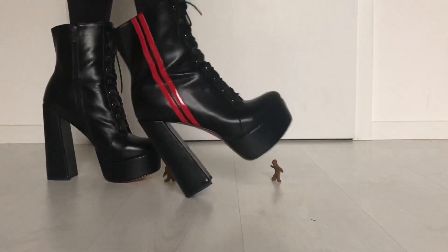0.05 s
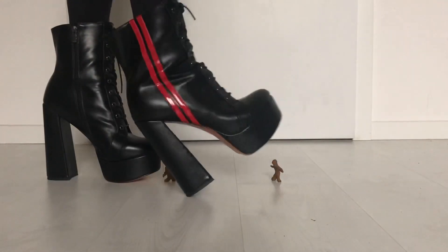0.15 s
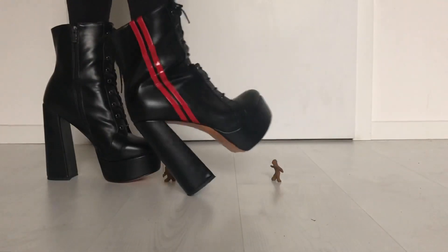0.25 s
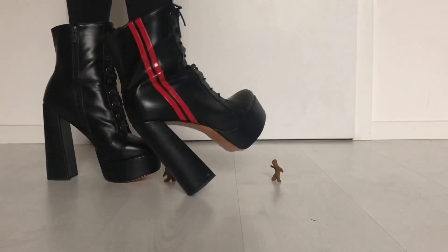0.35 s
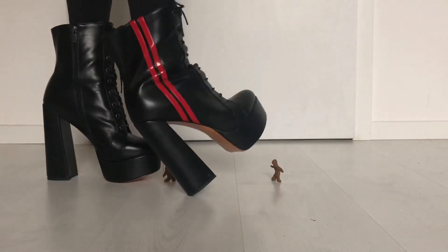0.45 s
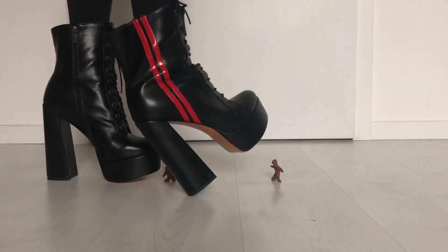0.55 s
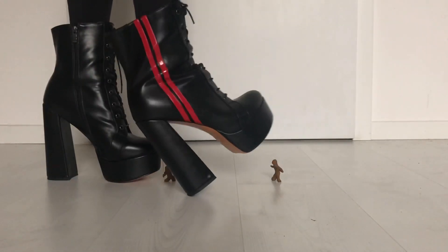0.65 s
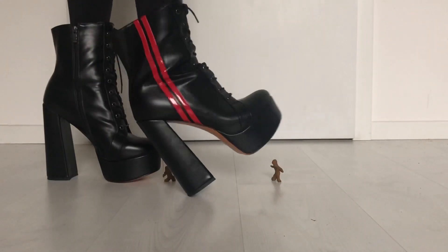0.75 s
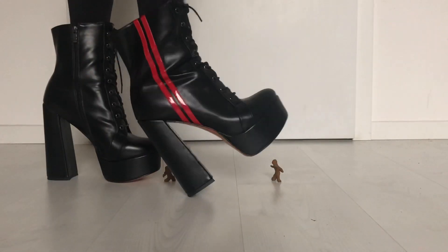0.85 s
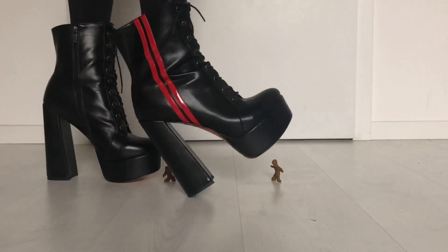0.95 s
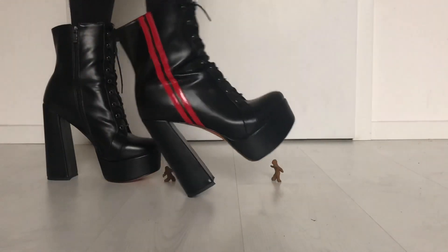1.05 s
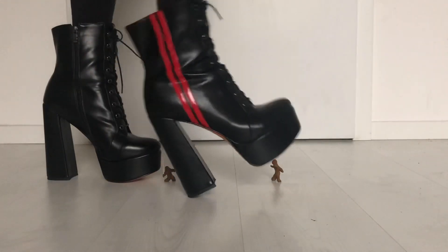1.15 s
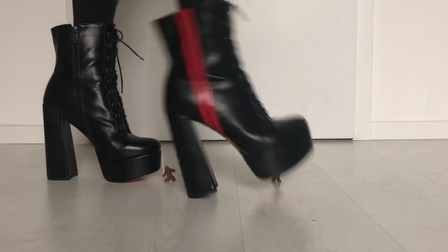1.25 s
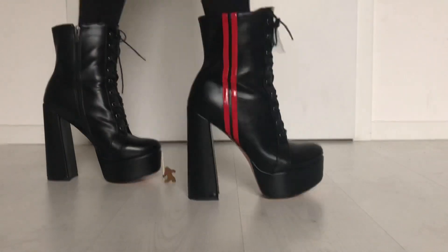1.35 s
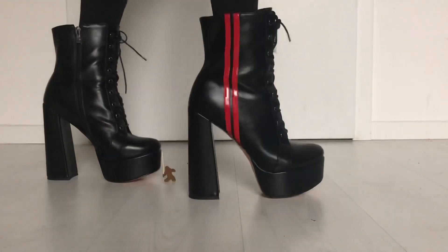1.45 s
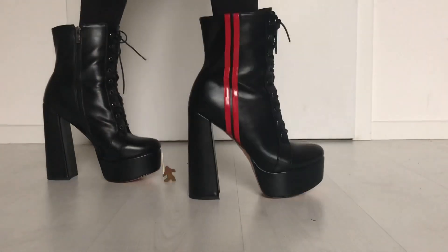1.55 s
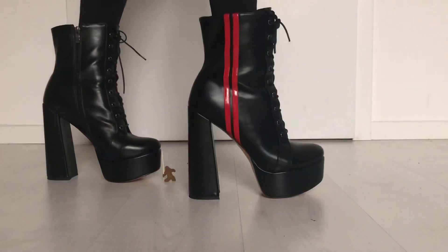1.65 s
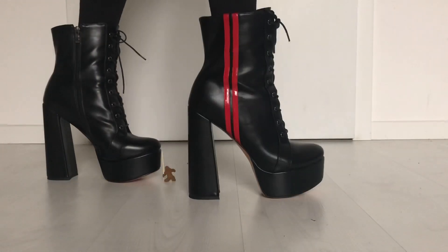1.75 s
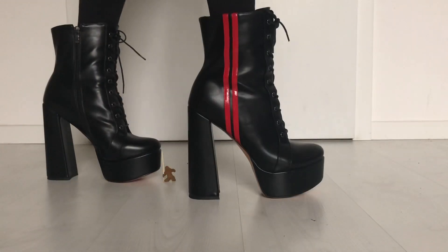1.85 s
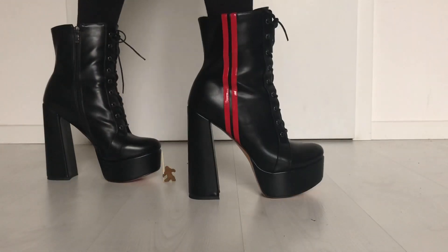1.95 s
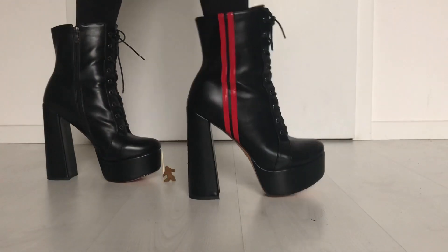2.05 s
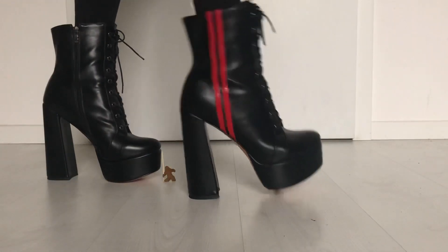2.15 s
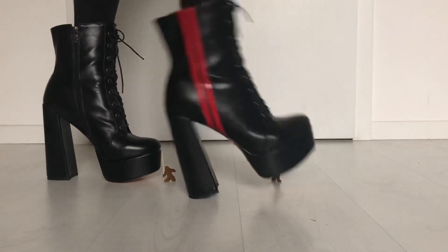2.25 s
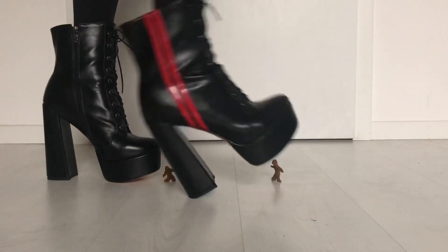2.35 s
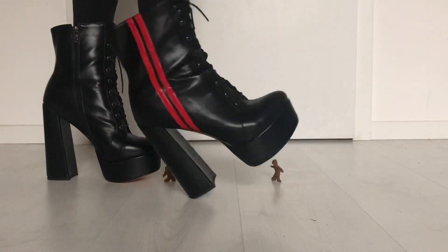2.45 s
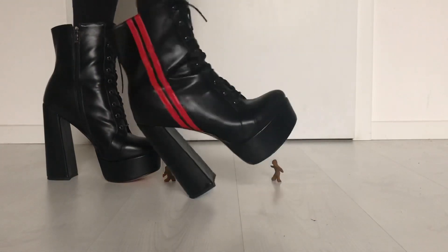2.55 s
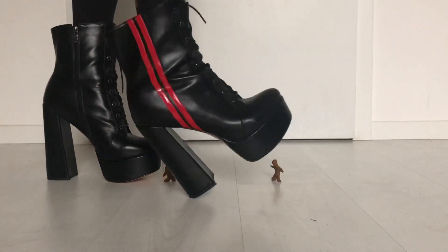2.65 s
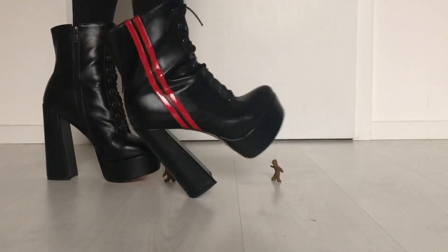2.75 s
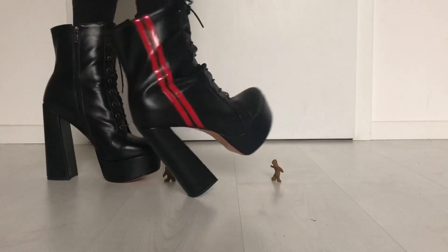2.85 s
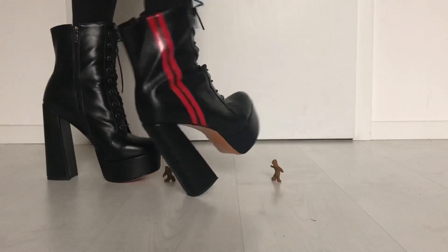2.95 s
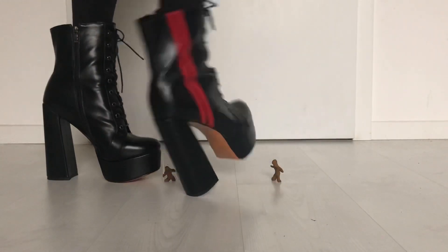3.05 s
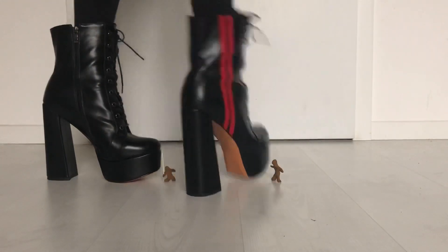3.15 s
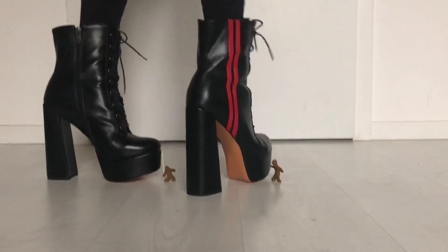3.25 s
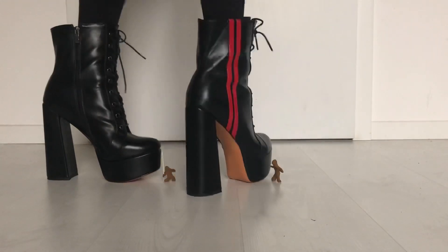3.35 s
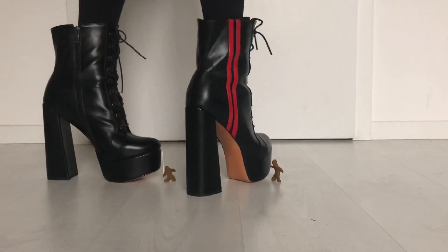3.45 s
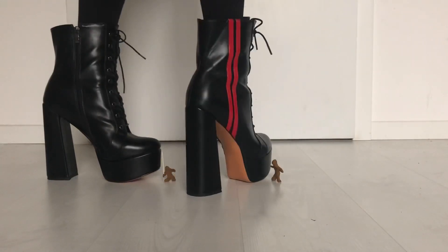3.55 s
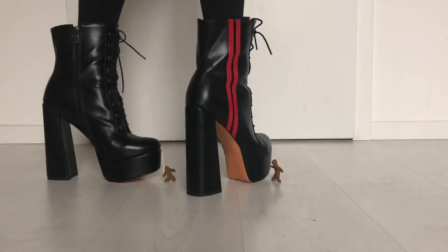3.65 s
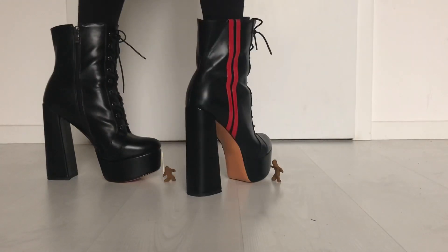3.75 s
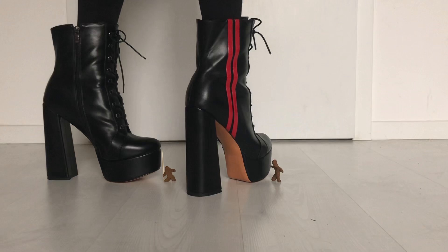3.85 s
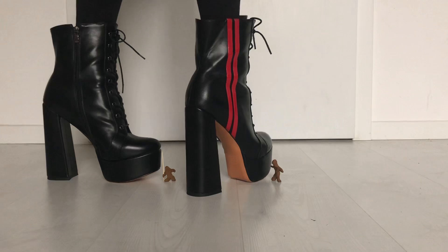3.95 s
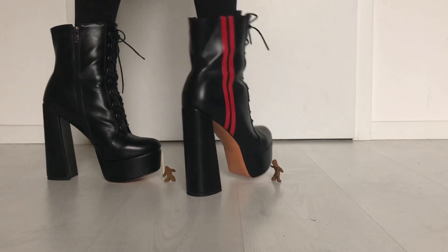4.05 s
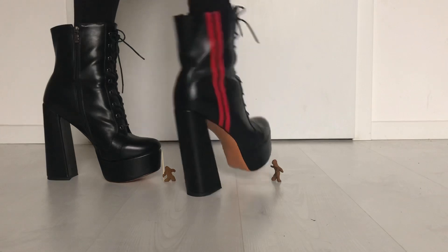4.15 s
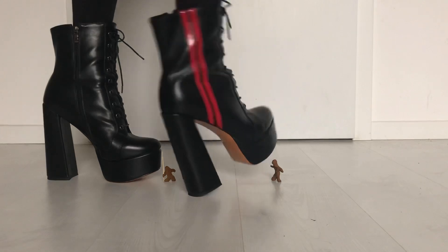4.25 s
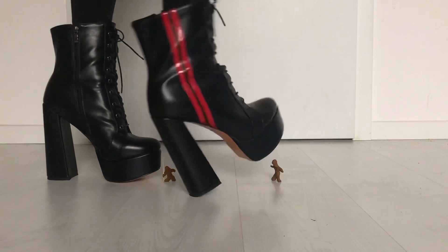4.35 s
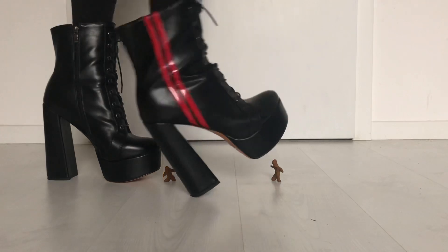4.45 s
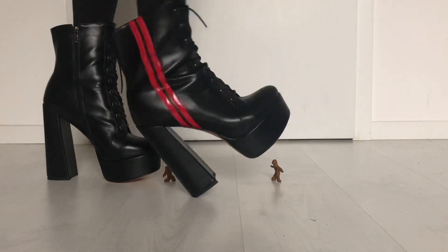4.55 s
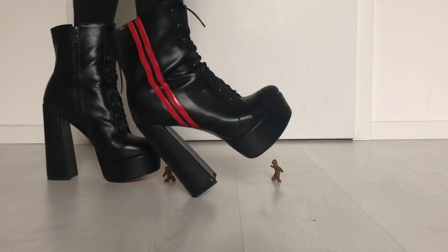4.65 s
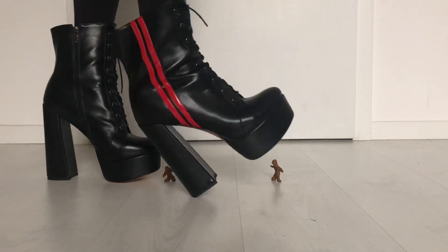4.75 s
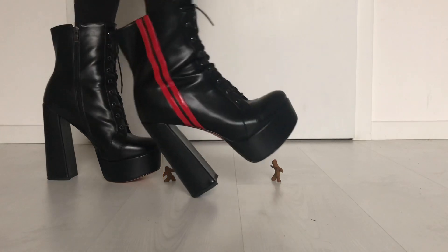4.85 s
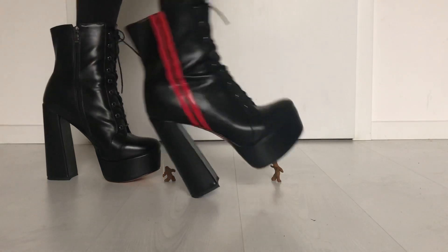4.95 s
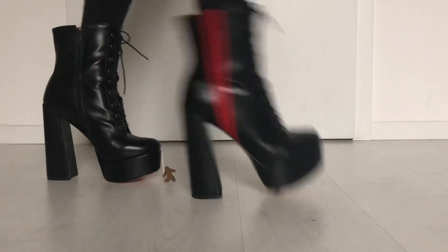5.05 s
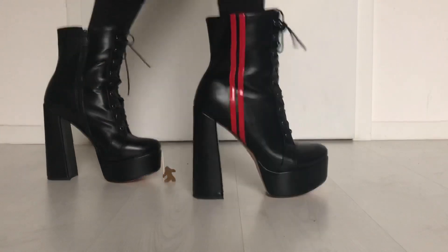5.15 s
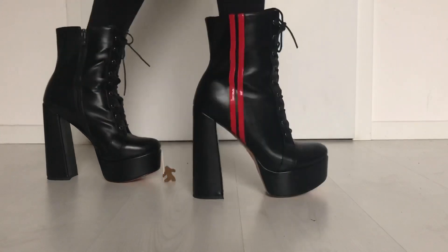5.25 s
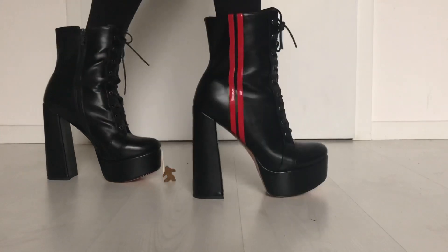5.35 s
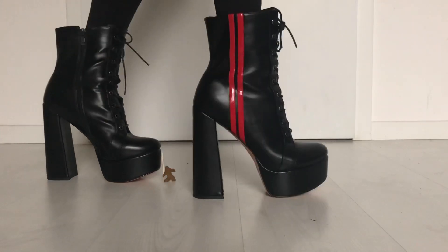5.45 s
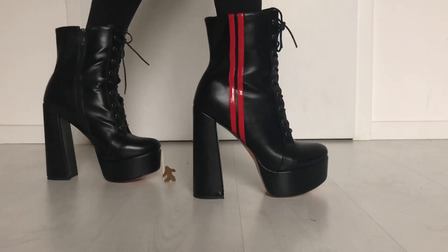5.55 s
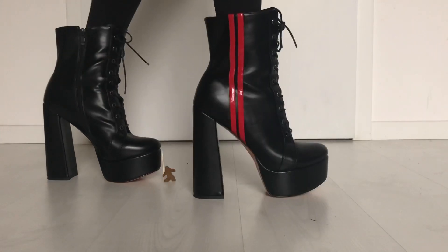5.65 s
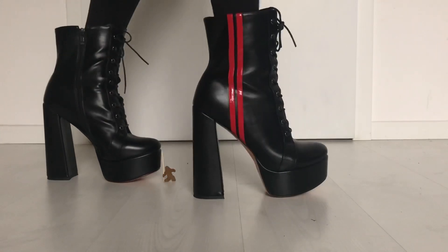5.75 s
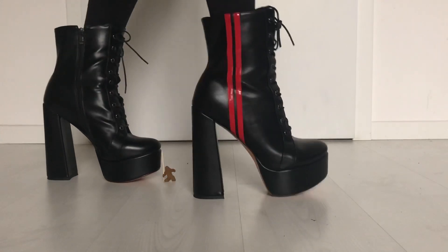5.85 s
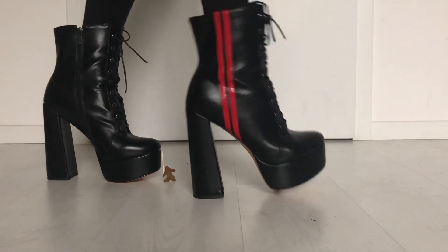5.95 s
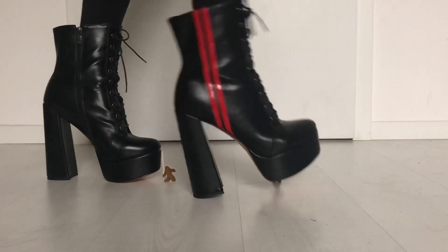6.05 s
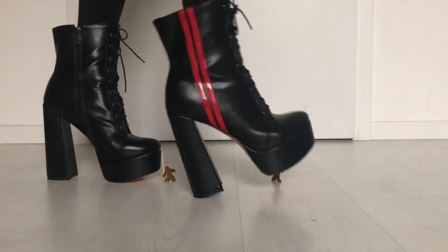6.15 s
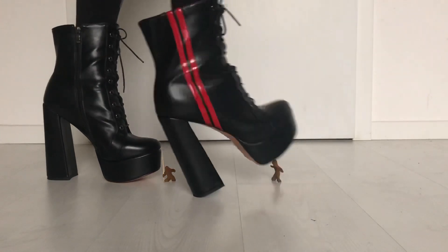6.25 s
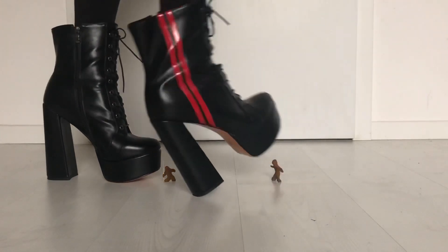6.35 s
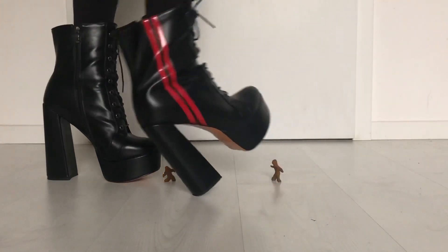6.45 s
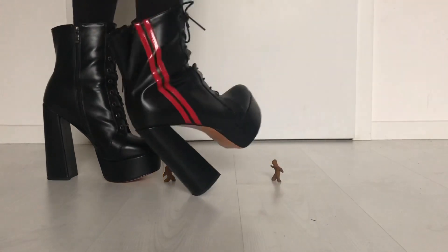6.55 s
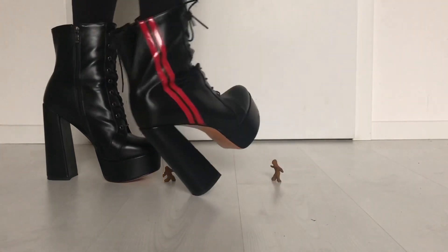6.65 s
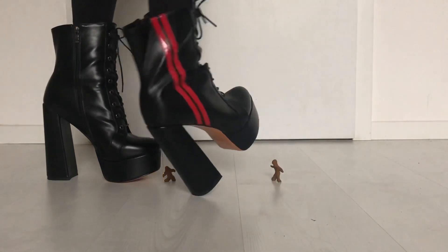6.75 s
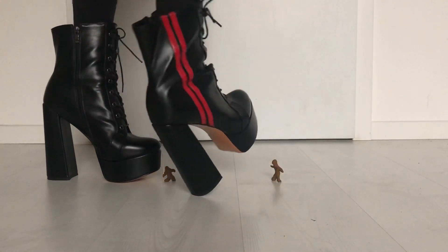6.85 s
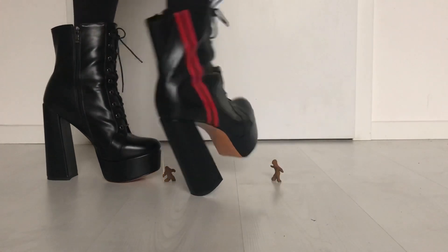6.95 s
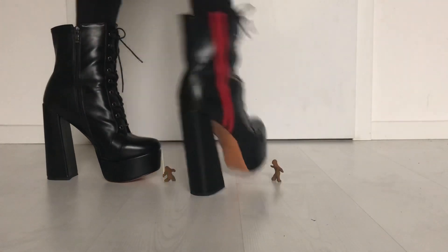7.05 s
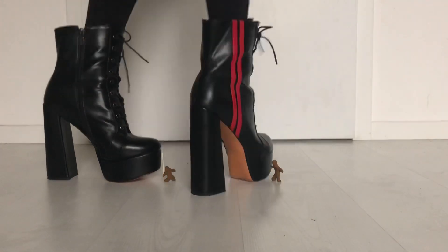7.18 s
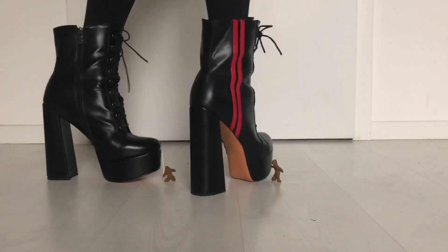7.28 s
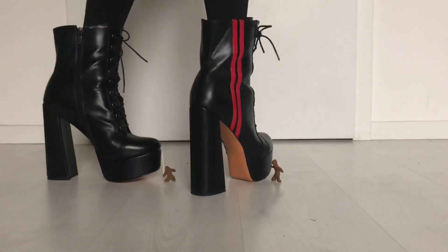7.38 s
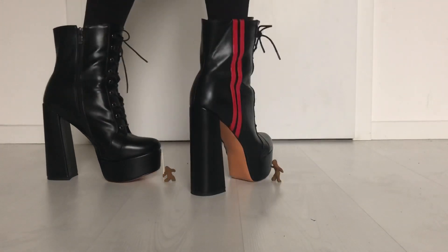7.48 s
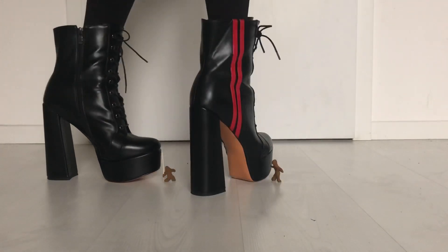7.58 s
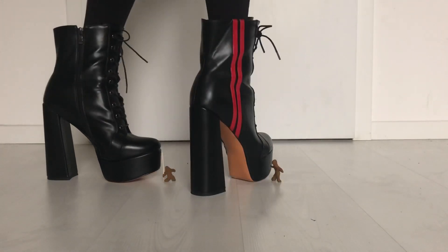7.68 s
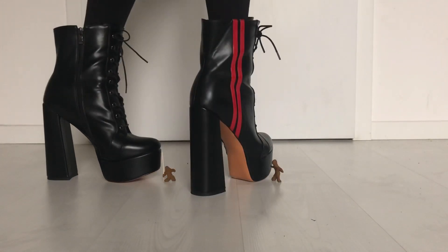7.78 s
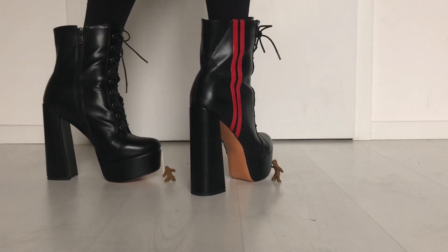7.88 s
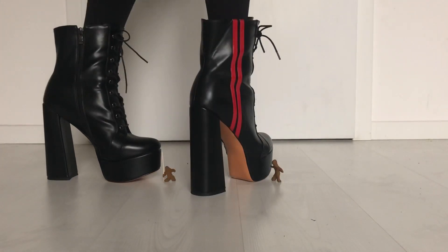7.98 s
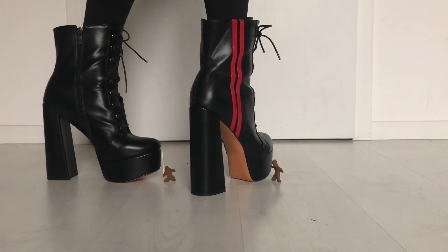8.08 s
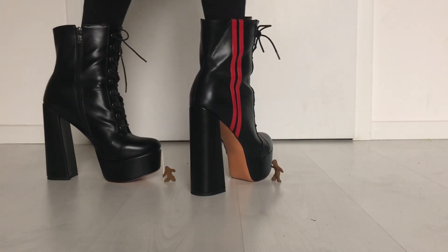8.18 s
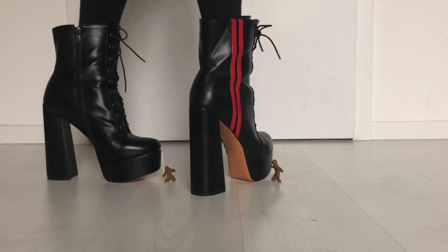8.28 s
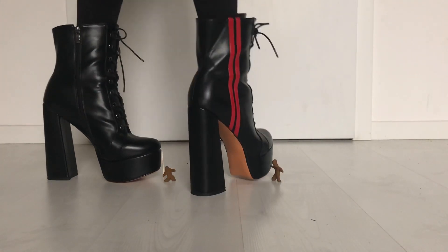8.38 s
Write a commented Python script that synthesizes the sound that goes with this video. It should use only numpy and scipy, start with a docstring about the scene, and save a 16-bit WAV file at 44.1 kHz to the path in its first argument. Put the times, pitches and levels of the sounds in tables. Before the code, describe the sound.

Four hard, hollow boot stamps on a laminate floor in a small quiet room, with leather rubs, light heel taps and lace ticks between.

```python
"""In a small quiet room, boots rustle and tap close to the microphone between four stamps on a laminate floor.
At each stamp a gritty crack spreads through the boards as a bending wave, treble first and bass last.
An echo, the room's tail and low resonances follow while the laces rattle.
Around the stamps, filtered noise makes the leather's rub and creaks, and short bursts make taps and ticks.
Shaped noise gives the room's air and a faint low drone throughout."""
import sys
import numpy as np
from scipy import signal
from scipy.fft import rfft, irfft, next_fast_len
from scipy.io import wavfile

SR = 44100
rng = np.random.default_rng(int(sys.argv[2]) if len(sys.argv) > 2 else 0)


def master(y):
    """Save y as 16-bit WAV."""
    cut = np.clip(np.atleast_2d(y).T, -1, 1)
    pcm = np.round(cut * 32767)  # scale
    wavfile.write(sys.argv[1], SR, pcm.astype(np.int16))


N = 371322  # samples in the whole scene

# The four stamps; all levels are relative:
# start_s, level_db, hollow_body_db, flat_sole_clack_db, crack_db, tilted_edge_snap_db
STAMP_LIST = [(1.2921, -4, -2.5, 3.5, -3.5, -2), (3.1425, -0.83, 1.5, -5, 0.3, 0),
              (5.041, -.7, -1.5, 2.5, 1.2, -1.5), (7.0580, 2, 3, -1, -5.3, 10)]

SIZE = 32768  # samples in one short sound
HZ = np.fft.rfftfreq(SIZE, 1 / SR) + 1  # 1 Hz up, so that nothing divides by zero
T = np.arange(SIZE) / SR  # seconds
LEAD = SIZE // 16  # spare samples ahead of each short sound


def stamps():
    """The sole slams down: a gritty crack, a falling sweep from the boards, a wall echo and the room's ring."""
    # How strongly the wave in the boards sounds: pitch_hz, level_db
    board_levels = [(45, 1), (85, 17), (125, 33.5), (180, 35), (245, 18.5), (360, 29), (500, 22),
                    (680, 23.3), (1050, 12), (1600, 0), (2500, -10), (3400, 4.7), (4800, -2.5), (5700, -14),
                    (8000, -18.5), (15000, -36)]
    # What the whole floor sends into the room: pitch_hz, level_db
    boom_levels = [(35, -4), (80, 14.5), (150, 26), (260, 23.5), (400, 18), (680, 10), (950, 7),
                   (1400, -5.5), (2000, -6.5), (2600, -11), (4000, -10), (8000, -28), (15000, -40)]
    # Low resonances of floor and room: pitch_hz, level_db, t60_s (time to fade by 60 dB)
    resonances = [(85, -38, 0.42), (133, -44, 0.28), (153, -42.5, 0.21), (189, -39, 0.21), (205, -36, 0.16),
                  (292.3, -36, 0.34), (340, -39.5, 0.23), (396, -39, 0.2), (560, -43, 0.38), (980, -55, .3)]
    out = np.zeros(N)
    sweep = bending(travel_s=.0023, knee_hz=205)
    grit = 1 / (1 + (2000 / HZ) ** 2)  # the treble comes from many small points of contact
    echo_delay = np.exp(-2j * np.pi * HZ * .0267)  # seconds
    echo = amp(-16) * (1 - .6 * grit) * echo_delay  # duller than the direct sound

    late = np.maximum(T - .014, 0)  # the resonances start once the slow bass has arrived
    ring = np.zeros(SIZE)
    for hz, db, t60_s in resonances:
        ring += amp(db - 60 * late / t60_s) * np.sin(2 * np.pi * hz * late)
    ring = rfft(ring * (1 - np.exp(-late / 0.0096)))  # swells in softly

    board = causal(amp(along(board_levels, HZ)))
    boom = causal(amp(along(boom_levels, HZ)))
    for start_s, db, body_db, clack_db, crack_db, snap_db in STAMP_LIST:
        body = body_db * bump(400, 0.82)
        clack = clack_db * bump(940, 0.34)
        snap = snap_db * bump(7500, 0.39)
        contact = causal(amp(db + body + clack + crack_db * grit + snap))
        crack = 1 + amp(-3) * grit * burst(t60_s=0.023)  # first touch, then the sole grinding home
        direct = board * crack * (1 + echo)
        tail = boom * room(onset_s=0.0083)
        laces = rattle(db=-25, hz=3500, clicks_per_s=140, t60_s=0.33)
        add(out, start_s, contact * (sweep * (direct + tail) + ring) + laces)
    return out


def bending(travel_s, knee_hz):
    """Boards carry high notes fastest: travel_s is about the delay at 1 kHz, levelling off below the knee."""
    delay_s = travel_s * 1000 / np.hypot(HZ, knee_hz)
    return np.exp(-2j * np.pi * np.cumsum(delay_s) * SR / SIZE)  # delays added up into phase


def rattle(db, hz, clicks_per_s, t60_s):
    """Laces and eyelets, shaken by a blow, click at random and settle."""
    clicks = (rng.random(SIZE) < clicks_per_s / SR) * rng.standard_normal(SIZE)
    fading = clicks * amp(-60 * T / t60_s)
    return rfft(fading) * causal(amp(db) * bump(hz, 1.2))


def taps():
    """The heel's edge clicks down and scuffs on; the weight follows with a soft thud."""
    # Light taps as the heel rocks on the floor; levels are relative: start_s, click_db, thud_db
    tap_list = [(0.7647, -20, -15), (1.9582, -22, -5.5), (2.2854, -24.5, -35), (2.364, -23, -30),
                (2.6748, -21.5, -22), (2.876, -28, -35), (3.893, -20.5, -25), (3.9024, -17, -10.5),
                (3.9393, -19.5, -24), (4.2468, -25.5, -35), (4.7099, -26, -28.5), (4.8102, -26.5, -26),
                (5.778, -32.5, -12), (6.1788, -23, -17.5), (6.277, -29, -20), (6.6562, -26, -22),
                (6.739, -27.5, -24), (8.017, -30, -32), (8.244, -25, -13.5), (8.272, -25.5, -20)]
    # Tone of the click from the heel's edge: pitch_hz, level_db
    click_levels = [(50, -23.5), (150, 0.5), (400, -1.5), (1000, -3), (2200, -7), (5000, -14), (15000, -31)]
    thud_lag_s, thud_hz, thud_octaves = .016, 159, .7  # the weight settles just after the click
    out = np.zeros(N)
    sweep = bending(travel_s=.0012, knee_hz=300)
    thud_shape = bump(thud_hz, thud_octaves) + amp(-26) * bump(900, 1.3)
    for start_s, click_db, thud_db in tap_list:
        touch = burst(t60_s=0.0083) + amp(-6.5) * burst(t60_s=0.046)  # click, then scuff
        edge = causal(amp(click_db + along(click_levels, HZ)))
        add(out, start_s, edge * (sweep * touch + amp(-6.5) * room(onset_s=0.0079)))

        weight = causal(amp(thud_db) * thud_shape)
        thud = weight * (sweep * burst(t60_s=.05) + amp(-5) * room(onset_s=.008))
        add(out, start_s + thud_lag_s, thud)
    return out


def ticks():
    """Hard lace tips ping in a narrow band; eyelets and folds click in a wide one."""
    # Ticks of lace tips, eyelets and leather folds; levels are relative:
    # start_s, level_db, pitch_hz, width_octaves
    tick_list = [(1.344, -27.5, 10400, .35), (1.5035, -39.5, 7000, 2.3), (2.3655, -28, 7500, .11),
                 (3.1236, -23, 2400, 0.31), (3.1707, -18.5, 5000, .34), (3.2206, -28, 9500, 1),
                 (3.395, -41.5, 4036, 1.8), (4.2479, -31.5, 6930, 0.83), (5.088, -26, 11490, .42),
                 (5.0926, -19.5, 4200, 1.3), (5.218, -33, 4000, .8), (5.221, -23.5, 11250, .2),
                 (5.342, -33.5, 3500, 1.6), (6.6526, -40, 9020, 0.94), (6.7383, -26.5, 7500, 0.079),
                 (7.104, -30, 12000, .5), (7.1401, -26.5, 9800, .55)]
    out = np.zeros(N)
    for start_s, db, hz, octaves in tick_list:
        click = burst(t60_s=.012) + amp(-3) * room(onset_s=.008)
        add(out, start_s, causal(amp(db) * bump(hz, octaves)) * click)
    return out


def leather(creak_db, creaks_per_s, uneven_db):
    """Flexing leather gives a soft rub that catches and lets go, with tiny slips scattered through it."""
    # Tone of the rub: pitch_hz, level_db (per Hz, relative)
    rub_levels = [(100, 8), (400, 8.5), (1000, 4), (1900, 2.5), (3000, -2), (5000, -2), (8000, -5.5),
                  (15000, -9)]
    t = np.arange(N) / SR
    knots_s = np.arange(0, t[-1], .016)  # the grip drifts between random values this far apart
    grip_db = uneven_db * np.interp(t, knots_s, rng.standard_normal(len(knots_s)))
    slips = (rng.random(N) < creaks_per_s / SR) * rng.standard_normal(N)
    rub = rng.standard_normal(N) + amp(creak_db) * unit(slips)
    toned = unit(filtered(rub, lambda hz: amp(along(rub_levels, hz))))
    return flexing() * amp(grip_db) * toned


def flexing():
    """Strength of the leather's rub: a swell into every stamp and one for every smaller move of the foot."""
    # The leather flexes as the foot lifts, rocks or twists:
    # peak_s, level_db, fade_s (time to fade by 10 dB on either side)
    move_list = [(.785, -69, 0.02), (1.97, -68, .04), (2.11, -73, .07), (2.295, -60.5, 0.07),
                 (2.48, -73, .1), (2.69, -72.5, 0.14), (2.9, -71, 0.03), (3.91, -67, .07), (4.3, -71, 0.23),
                 (5.77, -71, 0.14), (6.02, -75, 0.17), (6.2, -66, 0.09), (6.37, -71, .17),
                 (7.52, -76, 0.05), (8.24, -66, 0.08)]
    # the rub as the leg swings down into each stamp and settles
    swing_db, rise_db_per_s, fall_db_per_s = -65, 110, 75
    lead_s, hold_s = .065, .06  # full strength from this long before the blow until this long after it
    rest_db = -80  # the rub while the foot only hovers
    t = np.arange(N) / SR
    power = amp(rest_db) ** 2
    for start_s, *_ in STAMP_LIST:
        rise_db = rise_db_per_s * np.maximum(start_s - lead_s - t, 0)
        fall_db = fall_db_per_s * np.maximum(t - start_s - hold_s, 0)
        power = power + amp(swing_db - rise_db - fall_db) ** 2
    for peak_s, db, fade_s in move_list:
        power = power + amp(db - 10 * np.abs(t - peak_s) / fade_s) ** 2
    return np.sqrt(power)


def flutter(db, hz, clicks_per_s, spread_db):
    """Loose laces and folds tick at random, as strongly as the leather moves."""
    strength = amp(spread_db * rng.uniform(-1, 1, N)) * flexing()
    clicks = (rng.random(N) < clicks_per_s / SR) * strength
    touch = burst(t60_s=.012) + amp(-3) * room(onset_s=.008)
    click = irfft(causal(amp(db) * bump(hz, 1.4)) * touch)
    return signal.fftconvolve(clicks, click)[:N]


def burst(t60_s):
    """Spectrum of a tiny rough contact: fading noise of energy 1."""
    x = rng.standard_normal(SIZE) * amp(-60 * T / t60_s)
    return rfft(x / np.linalg.norm(x))


def room(onset_s):
    """Spectrum of a fresh room tail of energy 1: noise that builds up, then fades at its own pace per pitch."""
    # How long the room rings: pitch_hz, t60_s (time to fade by 60 dB)
    fade_times = [(80, .33), (210, 0.28), (600, .35), (1500, 0.39), (4000, .34), (10000, 0.4)]
    hz, t, z = signal.stft(rng.standard_normal(SIZE), SR, nperseg=256)
    fade = amp(-60 * t / along(fade_times, hz)[:, None])
    tail = signal.istft(z * fade, SR, nperseg=256)[1][:SIZE]
    tail = tail * (1 - np.exp(-(T / onset_s) ** 4))
    return rfft(tail / np.linalg.norm(tail))


def background(air_db, drone_db, drone_hz):
    """Quiet room air and microphone hiss, with a faint, uneven low drone: noise through two filters."""
    # Tone of the quiet room and microphone hiss: pitch_hz, level_db (per Hz, relative)
    air_levels = [(12, -56), (20, -24.5), (37, -6.5), (59, -3), (90, -11.5), (129, -7.5), (207, -13.5),
                  (245, -12.5), (767, -23), (932, -25), (1340, -29), (1540, -30.5), (2090, -31.5),
                  (12000, -37), (15500, -39.5)]
    air = unit(filtered(rng.standard_normal(N), lambda hz: amp(along(air_levels, hz))))
    drone = unit(filtered(rng.standard_normal(N), lambda hz: 1 / (1 + ((hz - drone_hz) / 5) ** 2)))
    return amp(air_db) * air + amp(drone_db) * drone


def amp(db):
    """Decibels to gain."""
    return 10 ** (np.asarray(db) / 20)


def unit(x):
    """Scale to an average (rms) strength of 1."""
    return x / np.sqrt(np.mean(x ** 2) + 1e-20)


def along(points, hz):
    """Read between (pitch, value) points on a log pitch axis."""
    f, v = np.transpose(points)
    return np.interp(np.log(hz + 1), np.log(f), v)


def bump(hz, octaves):
    """A bell of height 1 on the log pitch axis."""
    return np.exp(-.5 * (np.log2(HZ / hz) / octaves) ** 2)


def causal(gain):
    """The filter with this gain that starts at once and rings afterwards (minimum phase)."""
    cepstrum = irfft(np.log(np.maximum(gain, 1e-6)))
    cepstrum[1:SIZE // 2] *= 2  # fold the half before time zero onto the half after it
    cepstrum[SIZE // 2 + 1:] = 0
    return np.exp(rfft(cepstrum))


def filtered(x, response):
    """Filter a whole track by a gain that depends on pitch."""
    m = next_fast_len(N + 8192)
    return irfft(rfft(x, m) * response(np.fft.rfftfreq(m, 1 / SR)), m)[:N]


def add(track, start_s, spectrum):
    """Mix a short sound, given as a spectrum, into the track at its start time."""
    start = round(start_s * SR) - LEAD
    track[start:start + SIZE] += np.roll(irfft(spectrum), LEAD)[:N - start]


def scene():
    """Boots and room at one microphone."""
    boots = stamps() + taps() + ticks()
    boots = boots + leather(creak_db=-7, creaks_per_s=220, uneven_db=2.0)
    boots = boots + flutter(db=21, hz=3000, clicks_per_s=26, spread_db=6)
    return (boots + background(air_db=-69.0, drone_db=-74.5, drone_hz=62.4))[None]


def record(dry):
    """The recorder keeps nothing from its band limit upwards."""
    top_hz = 15850
    return filtered(dry[0], lambda hz: hz < top_hz)[None]


dry = scene()
out = record(dry)
master(out)
```